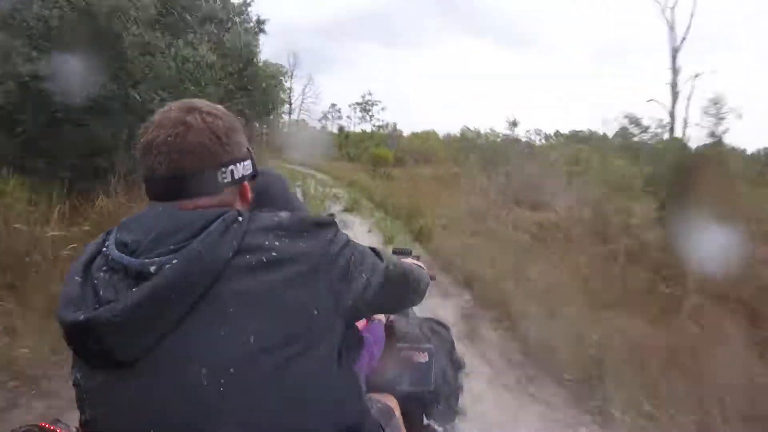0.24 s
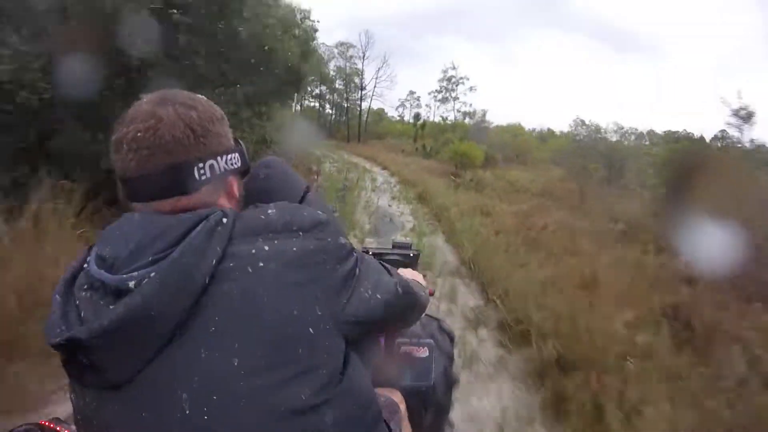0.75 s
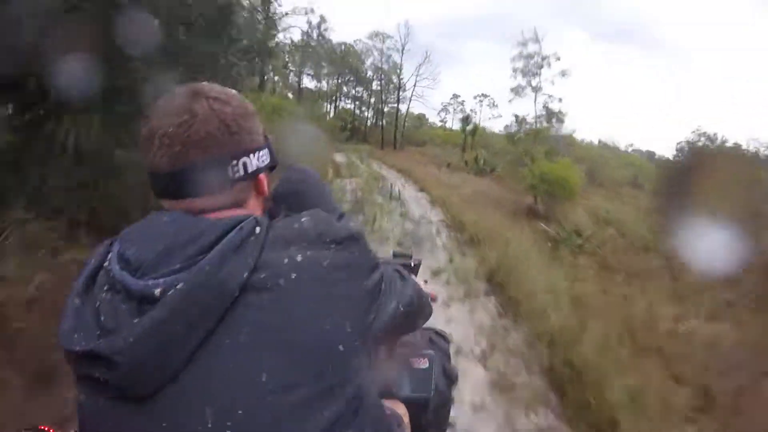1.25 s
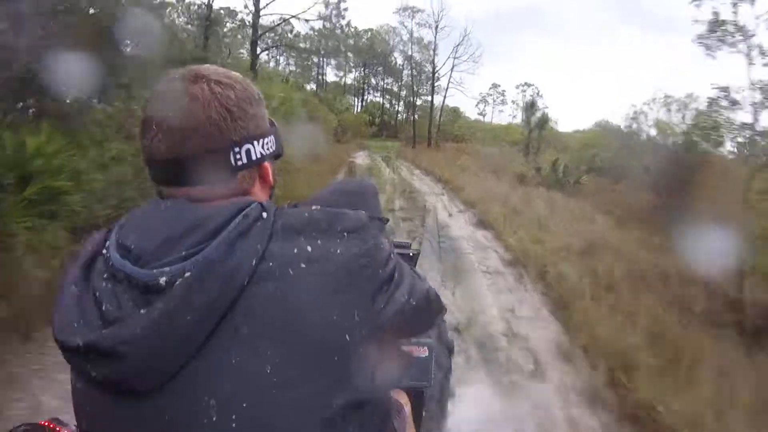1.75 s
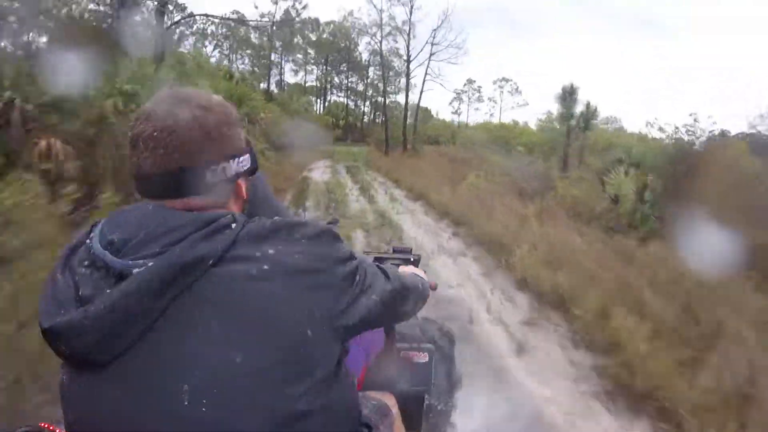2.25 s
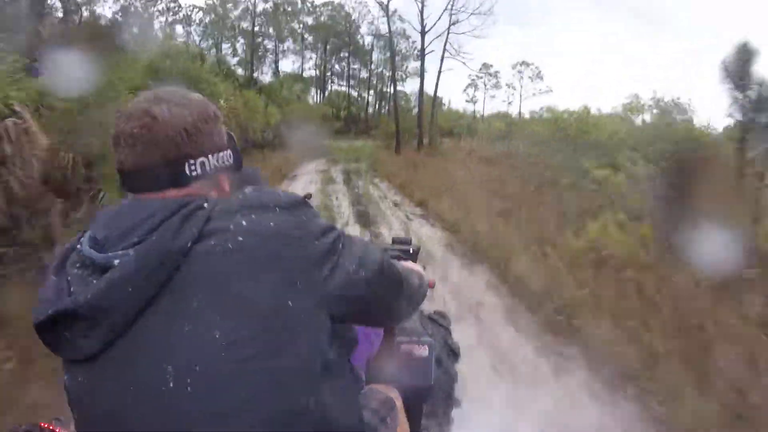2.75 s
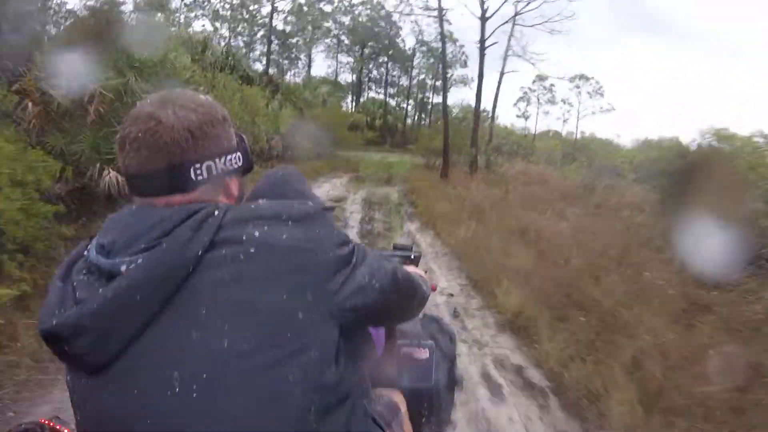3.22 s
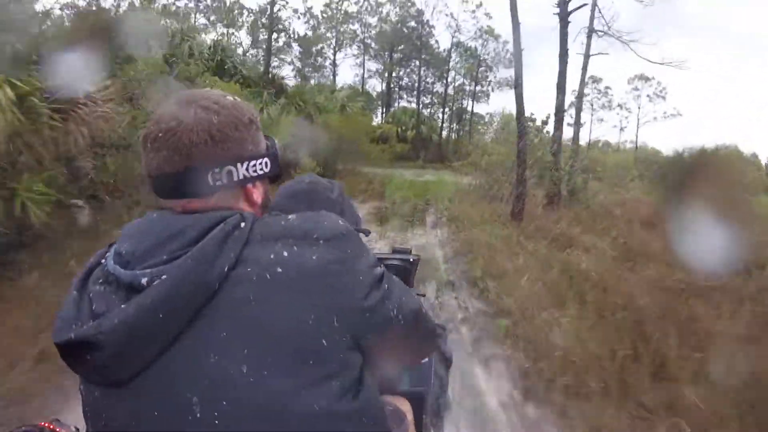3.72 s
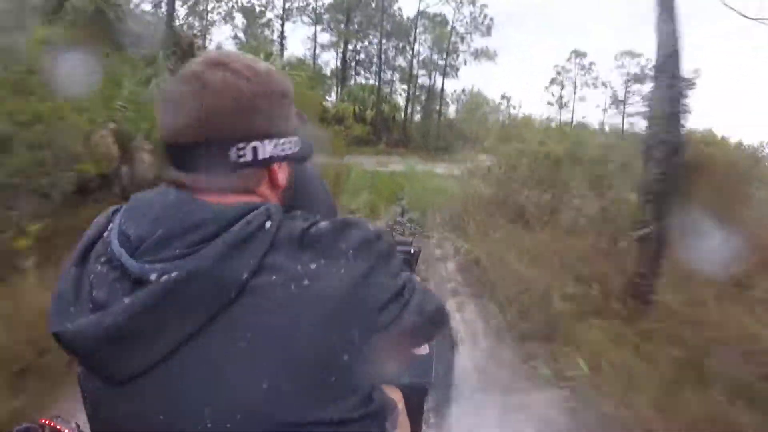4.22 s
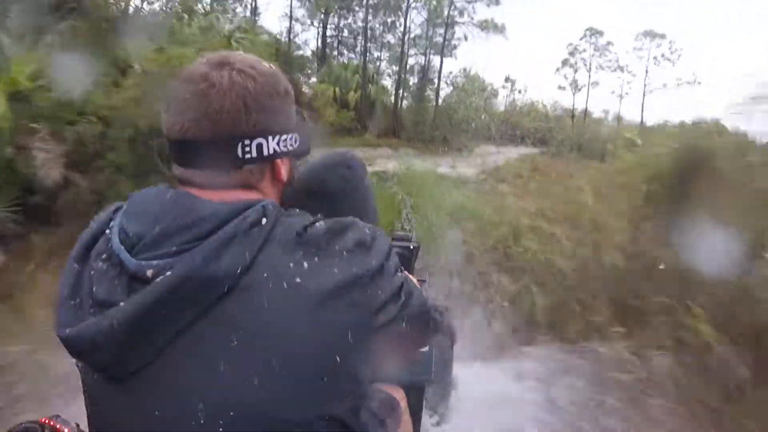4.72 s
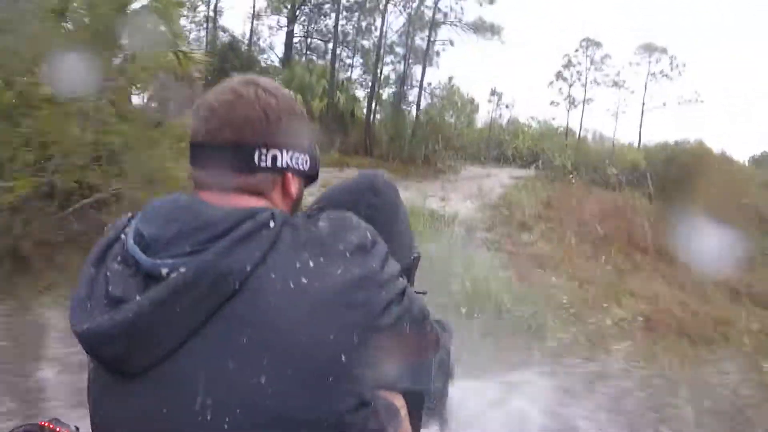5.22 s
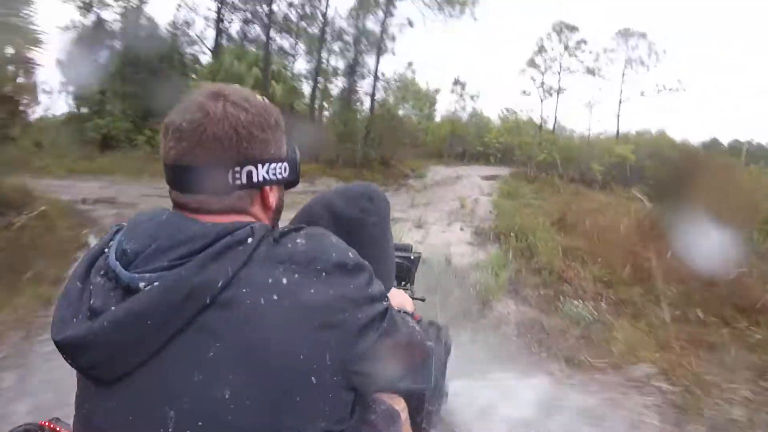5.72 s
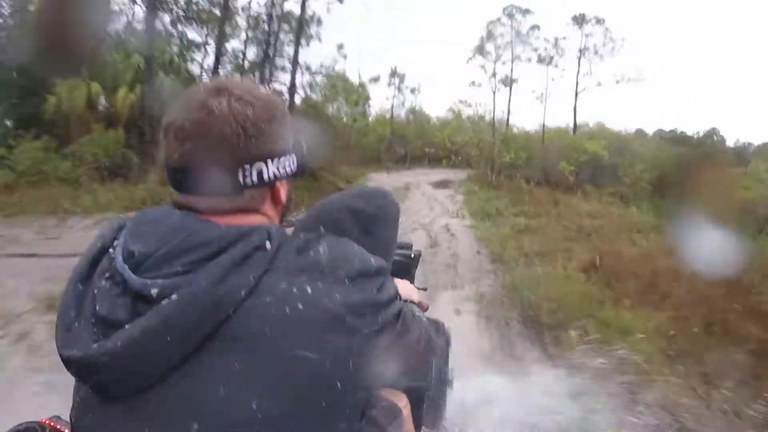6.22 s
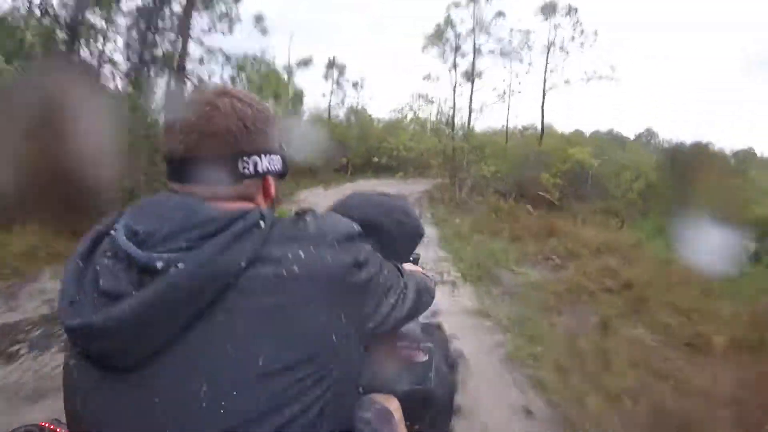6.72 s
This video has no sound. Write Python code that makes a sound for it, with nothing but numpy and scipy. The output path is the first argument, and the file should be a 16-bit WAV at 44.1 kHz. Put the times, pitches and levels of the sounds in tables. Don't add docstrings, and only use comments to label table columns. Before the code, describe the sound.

Close, rough quad engine revs in quick uneven bursts, droning through water while the shaken microphone rumbles, thuds and catches drops and grit.

```python
import sys
import numpy as np
from scipy import signal
from scipy.fft import rfft, irfft
from scipy.io import wavfile
from scipy.ndimage import uniform_filter1d

SR = 44100
rng = np.random.default_rng(int(sys.argv[2]) if len(sys.argv) > 2 else 0)


def attenuation_scalar(level_db):
    decades = np.asarray(level_db, float) / 20
    return 10 ** decades


def waveform_to_disk(signal):
    frames = np.transpose(np.atleast_2d(signal))
    scaled = np.clip(frames, -1, 1) * 32767
    samples = np.round(scaled).astype(np.int16)
    wavfile.write(sys.argv[1], SR, samples)


N = 306936


def curve(table):
    s, *columns = np.transpose(table)
    return [np.interp(np.arange(N) / SR, s, c) for c in columns]


def unit(x):
    return x / np.sqrt(np.mean(x ** 2))


def noise():
    return rng.standard_normal(N)


def dull(x, hz):
    return signal.sosfilt(signal.butter(4, hz, fs=SR, output="sos"), x)


def ring(x, hz, width_hz):
    return signal.lfilter(*signal.iirpeak(hz, hz / width_hz, fs=SR), x)


def body(x, modes):
    parts = [attenuation_scalar(db) * ring(x, hz, width) for hz, width, db in modes]
    return unit(sum((-1) ** k * part for k, part in enumerate(parts)))


def coloured(x, points):
    hz, db = np.transpose(points)
    bins = np.fft.rfftfreq(N, 1 / SR) + 1e-3
    gain = attenuation_scalar(np.interp(np.log(bins), np.log(hz), db))
    return unit(irfft(rfft(x) * gain, N))


def walk(rate):
    k = int(SR / rate)
    steps = np.repeat(rng.standard_normal(N // k + 1), k)
    return unit(uniform_filter1d(uniform_filter1d(steps, k), k)[:N])


def clicks(seconds, sizes):
    out = np.zeros(N + 2)
    place = np.clip(seconds * SR, 0, N)
    np.add.at(out, place.astype(int), sizes * (1 - place % 1))
    np.add.at(out, place.astype(int) + 1, sizes * (place % 1))
    return out[:N]


def fading(x, tau_s):
    return signal.lfilter([1], [1, -np.exp(-1 / (tau_s * SR))], x)


def burst(at, db, tau_s):
    return fading(clicks(at, attenuation_scalar(db)), tau_s) * rng.choice([-1, 1], N)


def held(start_s, hold_s, first_db, last_db, rest_db, rise_s, fall_s):
    end_s = start_s + hold_s
    corners = np.transpose([start_s - rise_s, start_s, end_s, end_s + fall_s])
    t = np.arange(N) / SR
    return np.max([np.interp(t, c, [rest_db, a, b, rest_db])
                   for c, a, b in zip(corners, first_db, last_db)], axis=0)


def follow(lever_db, share, offset_db):
    return offset_db - 45 + share * (lever_db + 45)


# (time [s], firing rate [Hz])
FIRING_RATE = [(0.0, 46.22), (0.622, 45.31), (0.762, 47.24), (0.99, 47.06), (1.56, 49.61), (1.948, 48.85),
               (2.723, 45.29), (3.068, 45.89), (3.361, 36.11), (3.634, 44.2), (3.986, 42.43), (4.251, 33.7),
               (4.418, 35.42), (4.8, 50.95), (5.194, 46.15), (5.639, 50.98), (6.486, 52.62), (6.96, 51.51)]


def steady_rate():
    return curve(FIRING_RATE)[0]


# (opens [s], shuts [s], exhaust level at opening [dB], exhaust level at shutting [dB])
THROTTLE_BLIPS = [(0.046, 0.477, -48.5, -41), (0.503, 0.748, -44, -41), (0.801, 0.979, -43, -40.5),
                  (1.02, 1.271, -44, -44), (1.303, 1.47, -52, -53.5), (1.699, 1.83, -45, -40.5),
                  (1.853, 1.986, -42.5, -48), (2.018, 2.18, -42.5, -44.5), (2.237, 2.465, -50.5, -43),
                  (2.53, 2.75, -50.5, -50), (2.758, 2.847, -43.5, -46.5), (2.857, 2.97, -48.5, -47.5),
                  (2.992, 3.193, -41.5, -49), (3.535, 3.753, -44, -40), (3.79, 3.896, -45, -41.5),
                  (3.92, 3.987, -48, -46.5), (4.02, 4.13, -57.5, -54.5), (4.3, 4.38, -55.5, -57),
                  (4.458, 4.434, -48, -50.5), (4.535, 4.606, -48, -43), (4.852, 4.987, -44, -44),
                  (5.008, 5.116, -51, -49.5), (5.228, 5.264, -48, -49), (5.309, 5.413, -49, -43.5),
                  (5.445, 5.702, -43.5, -46), (5.73, 5.991, -46, -43.5), (6.068, 6.219, -50.5, -44),
                  (6.266, 6.47, -48.5, -47.5), (6.596, 6.699, -57, -45.5), (6.717, 6.911, -53, -46)]


def throttle():
    opens, shuts, first_db, last_db = np.transpose(THROTTLE_BLIPS)
    idle_db = -57 - 0.17 * (steady_rate() - 36)
    blips_db = held(opens, shuts - opens, first_db, last_db, rest_db=-64.5, rise_s=0.049, fall_s=0.041)
    return np.maximum(blips_db, idle_db)


def surge(lever_db):
    hz_per_db, lag_s, settle_s = 0.3, 0.057, 0.3
    lagged = fading(lever_db + 44.5, lag_s) * (1 - np.exp(-1 / (lag_s * SR)))
    return hz_per_db * (lagged - uniform_filter1d(lagged, int(settle_s * SR)))


def strokes(turns, hz):
    chance = rng.standard_normal((400, 4)).T[:, :int(turns[-1])]
    at = np.interp(1 + np.arange(chance.shape[1]), turns, np.arange(N) / SR)
    cracks = clicks(at + 0.00005 * chance[0], attenuation_scalar(1.3 * chance[1]))
    gulps = clicks(at + 0.0102 + 0.0006 * chance[2], attenuation_scalar(2.5 * chance[3]))
    harder_at_speed = np.clip(0.15 + 0.07 * (hz - 46), 0, 1)
    return cracks, gulps * harder_at_speed


def treble(x):
    return signal.sosfilt(signal.butter(6, 1150, "high", fs=SR, output="sos"), x)


# (pitch [Hz], width [Hz], level [dB])
EXHAUST_MODES = [(325, 44, -5.5), (515, 120, -10), (593.5, 27, -6), (691, 41, 3), (837, 12, 2.5),
                 (985, 56, -4.5), (1183, 110, -11), (1270, 132, 1), (1530, 220, -3), (2025, 69, -1),
                 (2216, 97, -2), (3387, 140, -6)]


def exhaust_bark(blow, cracks, gulps):
    gas = unit((fading(cracks + gulps, 0.0055) + 0.03) * noise())
    bark = body(blow + 1.55 * treble(gas) + 0.1 * gas, EXHAUST_MODES)
    front = unit(ring(ring(blow, 1600, 1300), 1600, 1800))
    return bark + 0.3 * front


# (pitch [Hz], width [Hz], level [dB])
VALVE_MODES = [(3260, 360, 3.5), (4220, 200, 1), (4780, 650, -6.5), (5730, 470, 0), (7600, 570, -10)]


def valve_hiss(cracks, gulps):
    swell = fading(fading(cracks + gulps, 0.0019), 0.006) / 60
    return body((swell + 0.5) * noise(), VALVE_MODES)


# (multiple of firing rate [1], level [dB])
FRAME_BEATS = [(1, 3.5), (2, 3.5), (3, -14), (4, -12.5)]
# (time [s], change of level [dB])
DRIVE_PULL = [(0, 1.5), (.36, 1.5), (.5, 1), (1.25, 0.5), (1.6, 4.5), (1.77, 6), (2.2, 4), (2.6, 0),
              (3.2, 1.5), (3.55, -3), (3.75, -1.5), (3.88, 6), (4.4, -2), (4.75, 7.5), (4.95, -0.5),
              (5.4, 6), (6.2, 0.5), (6.96, 3)]


def frame_throb(turns, lever_db):
    throb = 0
    for k, db in FRAME_BEATS:
        throb = throb + attenuation_scalar(db + 1.5 * walk(12)) * np.sin(2 * np.pi * k * turns + 0.4 * walk(6))
    return throb * attenuation_scalar(follow(lever_db, 0.82, 17) + curve(DRIVE_PULL)[0])


# (start [s], held for [s], drone level [dB], airbox hoot level [dB])
DEEP_WATER = [(.08, 0.087, -42.5, -51), (.68, 0.061, -42, -47), (0.881, .08, -46, -43),
              (1.07, 0.11, -43.5, -51), (1.73, .1, -42, -48), (2.33, 0.062, -47.5, -45.5),
              (2.79, .04, -45, -52), (3.011, 0.085, -40, -44.5), (3.26, .14, -45, -44.5),
              (3.42, 0.061, -51, -58), (3.5, 0.067, -41.5, -44), (3.83, 0.049, -55, -36),
              (3.98, 0.1, -58, -45.5), (4.19, 0.053, -46, -49), (4.28, 0.084, -46, -50),
              (4.55, 0.031, -40.5, -43), (4.64, .18, -41, -46), (4.84, 0.14, -41.5, -41),
              (5.03, .17, -42.5, -43.5), (5.24, 0.01, -39, -42), (5.899, 0.083, -41.5, -40.5),
              (6.141, 0.12, -43, -46.5), (6.36, 0.089, -40, -50), (6.71, 0.19, -43.5, -45)]


def labour(lever_db):
    s, hold_s, drone_db, hoot_db = np.transpose(DEEP_WATER)

    def wade(db):
        return held(s, hold_s, db, db, rest_db=-67.5, rise_s=0.04, fall_s=0.026)

    return (np.maximum(follow(lever_db, 0.27, -6), wade(drone_db)),
            np.maximum(follow(lever_db, 0.8, -1.5), wade(hoot_db)))


# (pitch [Hz], width [Hz], level [dB])
BLOCK_MODES = [(577, 76, -14.5), (1279.7, 50, -0.5), (1343, 76, 1), (1842, 103, -7.5), (3200, 500, -18)]


def block_drone(blow, knock):
    push = blow + 1.5 * treble(knock)
    return unit(sum(attenuation_scalar(db) * ring(ring(push, hz, w), hz, 2 * w) for hz, w, db in BLOCK_MODES))


def airbox_hoot(blow, knock):
    airbox_hz = 424.7
    return unit(ring(ring(blow + knock, airbox_hz, 33.6), airbox_hz, 120))


def engine(lever_db):
    hz = steady_rate() + surge(lever_db)
    turns = 0.48 + np.cumsum(hz) / SR
    cracks, gulps = strokes(turns, hz)
    blow = unit(dull(cracks, 2740))
    knock = unit((fading(fading(cracks, 0.002), 0.004) / 50 + 0.2) * noise())
    drone_db, hoot_db = labour(lever_db)
    bark = exhaust_bark(blow, cracks, gulps) * attenuation_scalar(lever_db + 6.5)
    hiss = valve_hiss(cracks, gulps) * attenuation_scalar(follow(lever_db, 0.75, -12) + 1.8 * walk(33))
    drone = dull(block_drone(blow, knock), 4300) * attenuation_scalar(drone_db + 1)
    hoot = airbox_hoot(blow, knock) * attenuation_scalar(hoot_db + 0.5)
    return dull(dull(bark + hiss, 7700) + drone, 7000) + hoot + frame_throb(turns, lever_db)


# (pitch [Hz], level per Hz [dB])
SHAKE_SPECTRUM = [(7, -6), (27, 1), (48, -3), (75, -12.5), (140, -24), (253, -28.5), (340, -44),
                  (900, -125)]
# (time [s], change of shake level [dB])
RUMBLE_SWELLS = [(0.0, 0.5), (.13, 9), (.25, -3.5), (.39, -4), (1.662, -14), (2.04, -8), (2.17, 4), (2.29, -5),
                 (2.77, -4), (2.89, 4.5), (2.96, -9), (3.06, 2.5), (3.18, -4.5), (3.24, 6.5), (3.31, -3),
                 (3.37, 8), (3.43, -10), (3.57, -0.5), (4.59, -9), (4.84, 0), (5.119, 4.5), (5.27, 10.5),
                 (5.32, -18), (5.95, -10), (5.99, 12.5), (6.05, -11.5), (6.4, 3), (6.65, -6), (6.71, 4.5),
                 (6.96, 5)]


def mount_shake(lever_db):
    bounce_hz, swell_s = 33.05, 0.079
    road = noise()
    bounce = unit(ring(ring(road, bounce_hz, 5.6), bounce_hz, 15))
    shake = unit(coloured(road, SHAKE_SPECTRUM) + 0.5 * bounce)
    slow = dull(shake, 140)
    shake = slow + (shake - slow) * attenuation_scalar(follow(lever_db, 0.25, 45.94))
    t = np.arange(N) / SR
    shake_db = -13 + sum(db * np.clip(1 - abs(t - s) / swell_s, 0, 1) for s, db in RUMBLE_SWELLS)
    return np.tanh(1.7 * shake * attenuation_scalar(shake_db)) / 1.7


# (pitch [Hz], level per Hz [dB])
SPRAY_SPECTRUM = [(300, -15), (450, -4), (700, -11), (1900, -12), (4400, -28), (7500, -37.5),
                  (11000, -54.5), (16000, -85.5)]


def spray(lever_db):
    droplets = (rng.random(N) < 0.04) * noise()
    patter = coloured(droplets, SPRAY_SPECTRUM) * attenuation_scalar(2 * walk(25))
    return patter * attenuation_scalar(follow(lever_db, 0.56, 0.5))


# (time [s], held for [s], level [dB])
HOUSING_JOLTS = [(.1, .02, -35), (.34, 0.094, -27), (.66, 0.063, -29), (.88, 0.095, -31.5),
                 (1.12, 0.078, -36), (1.345, 0.011, -32), (1.73, 0.09, -31.5), (1.88, 0.045, -34),
                 (2.07, 0.039, -29.5), (2.35, 0.017, -29), (2.701, 0.11, -33.5), (2.9, 0.12, -34),
                 (3.08, 0.024, -32), (3.229, 0.0066, -23), (3.63, 0.033, -22.5), (3.851, 0.12, -27.5),
                 (4.16, 0.037, -26.5), (4.439, 0.2, -24.5), (4.8, 0.016, -32.5), (4.95, .02, -33.5),
                 (5.18, 0.035, -28), (5.38, 0.21, -30.5), (5.77, .02, -28), (5.87, 0.026, -32.5),
                 (6.15, 0.04, -32.5), (6.3, .1, -31), (6.7, .01, -31), (6.8, .01, -31.5),
                 (6.91, 0.016, -28.5)]


def housing_jolts():
    s, hold_s, db = np.transpose(HOUSING_JOLTS)
    ring_db = held(s, hold_s, db, db, rest_db=-45, rise_s=0.087, fall_s=0.074)
    housing_hz, thud_hz = 254.8, 324
    housing = unit(ring(ring(noise(), housing_hz, 13.8), housing_hz, 87))
    thud = unit(ring(ring(noise(), thud_hz, 130), thud_hz, 220))
    return housing * attenuation_scalar(ring_db - 3) + thud * attenuation_scalar(-40 + 1.53 * (ring_db + 23.5))


# (time [s], peak level [dB])
HISS_PRICKS = [(0.177, -49.5), (0.4837, -51.5), (0.738, -52), (1.046, -58), (1.2625, -47.5), (1.3528, -47),
               (1.4317, -46), (1.4591, -47), (1.5652, -49.5), (1.8576, -46), (1.919, -48.5),
               (2.1593, -47.5), (2.79, -47.5), (3.1, -47), (3.244, -49), (3.3995, -48), (3.7587, -46.5),
               (4.3705, -49.5), (4.4386, -46.5), (4.6613, -47), (4.7238, -49), (4.8787, -52),
               (5.0485, -52.5), (5.24, -46), (5.514, -52), (5.819, -50.5), (5.9902, -46), (6.2342, -49),
               (6.454, -47.5), (6.9152, -46.5)]


def pricks():
    at, db = np.transpose(HISS_PRICKS)
    stray = rng.random((140, 2)).T
    at = np.r_[at, stray[0] * N / SR]
    db = np.r_[db, -60 + 6 * (2 * stray[1] - 1)]
    swell = burst(N / SR - at - 0.0015, db + 4, 0.0018)[::-1]
    return ring(ring(swell, 4700, 6800), 6400, 9000)


# (time [s], crack and shell ring level [dB], knock level [dB], knock pitch [Hz])
SHELL_TICKS = [(0.551, -36.5, -52, 1240), (1.048, -29.5, -17, 1550), (1.265, -35, -32, 1270),
               (1.4563, -44, -41, 1100), (1.507, -42, -47, 1370), (1.44, -40, -50, 1300),
               (1.5489, -46, -51, 1230), (1.57, -42.5, -44, 1240), (1.8556, -42, -24, 1480),
               (2.4525, -58, -41, 1270), (2.7913, -23, -16.5, 1420), (3.1, -43.5, -45, 1300),
               (3.248, -46, -37.5, 1290), (3.396, -45, -45, 1300), (4.0795, -46, -43, 1180),
               (4.1889, -46.5, -41, 1340), (4.22, -42, -20, 2220), (4.371, -46.5, -44, 1270),
               (4.4437, -46, -29, 1340), (4.5257, -49, -36, 1300), (4.6602, -35, -19.5, 1270),
               (4.8444, -34, -12, 1360)]


def ticks():
    s, shell_db, knock_db, knock_hz = np.transpose(SHELL_TICKS)
    crack = ring(ring(burst(s, shell_db + 6.5, 0.0021), 3800, 2500), 4800, 3500)
    hit = clicks(s, attenuation_scalar(shell_db + 35)) + burst(s, shell_db + 23, 0.002)
    shell = ring(ring(hit, 3410, 240), 2900, 1200)
    knock = sum(ring(clicks(s[[k]], attenuation_scalar(knock_db[[k]] + 26)), knock_hz[k], 160) for k in range(len(s)))
    return dull(crack, 7500) + shell + dull(knock, 3200)


def scene():
    lever_db = throttle()
    ride = mount_shake(lever_db) + spray(lever_db) + housing_jolts()
    return (engine(lever_db) + ride + pricks() + ticks())[None]


def roll_off(x):
    return signal.sosfilt(signal.butter(12, 15800, fs=SR, output="sos"), x)


def record(dry):
    edges = np.clip(np.minimum(np.arange(N), N - np.arange(N)) / 250, 0, 1)
    rounded = np.tanh(1.25 * dry * edges) / 1.25
    return roll_off(rounded)


dry = scene()
out = record(dry)
waveform_to_disk(out)
```